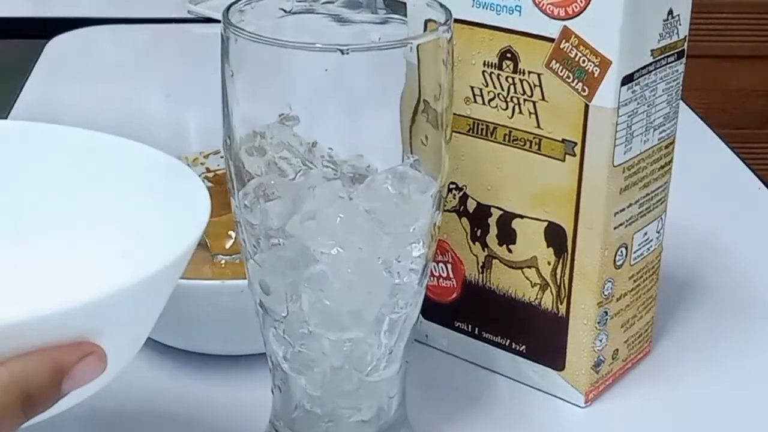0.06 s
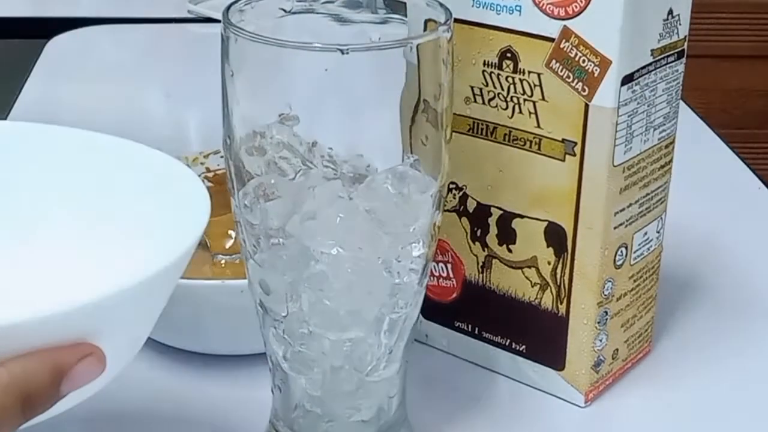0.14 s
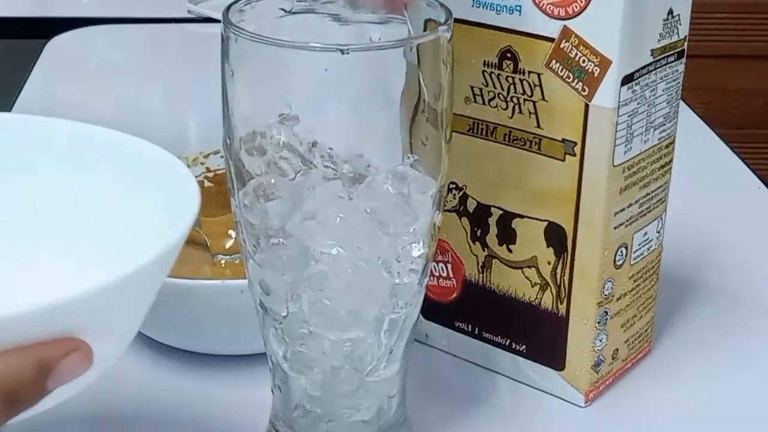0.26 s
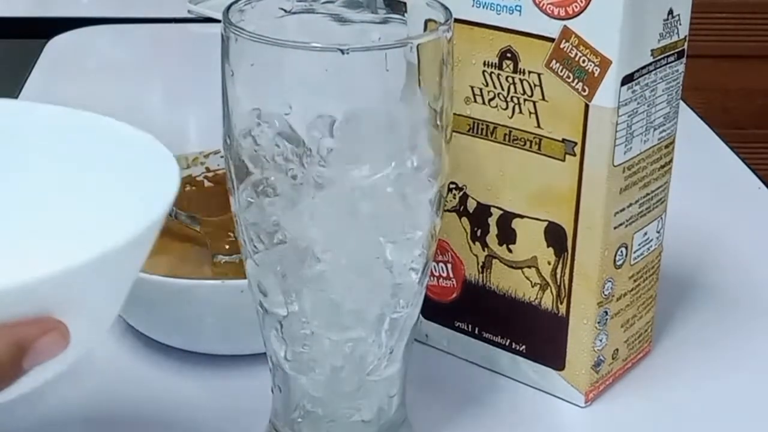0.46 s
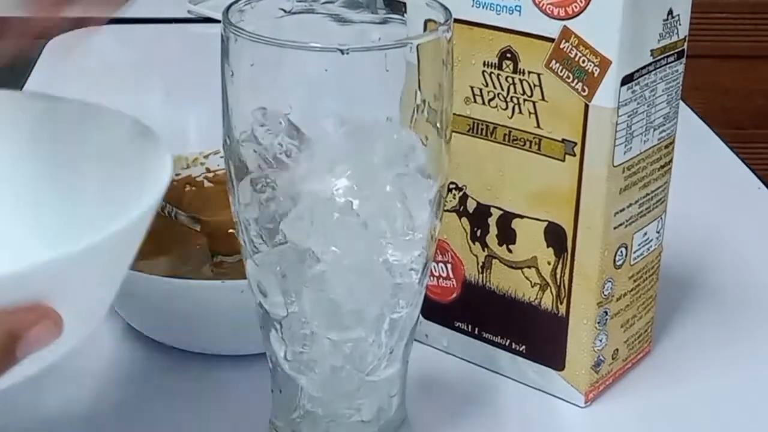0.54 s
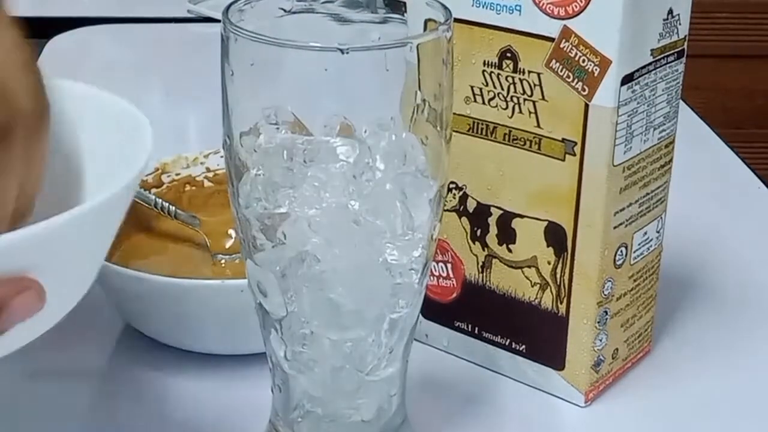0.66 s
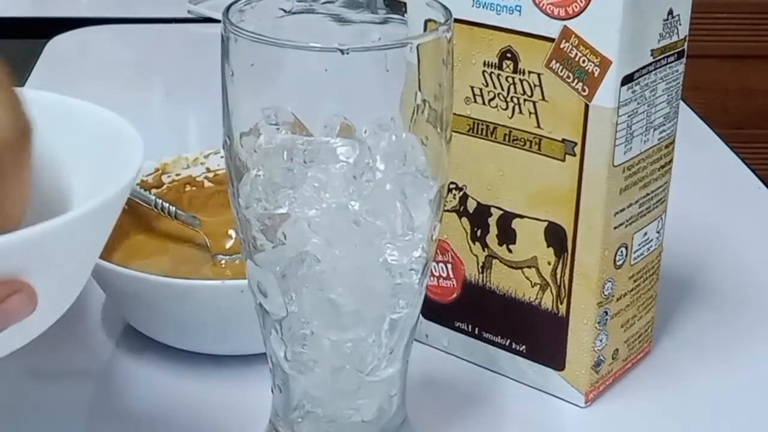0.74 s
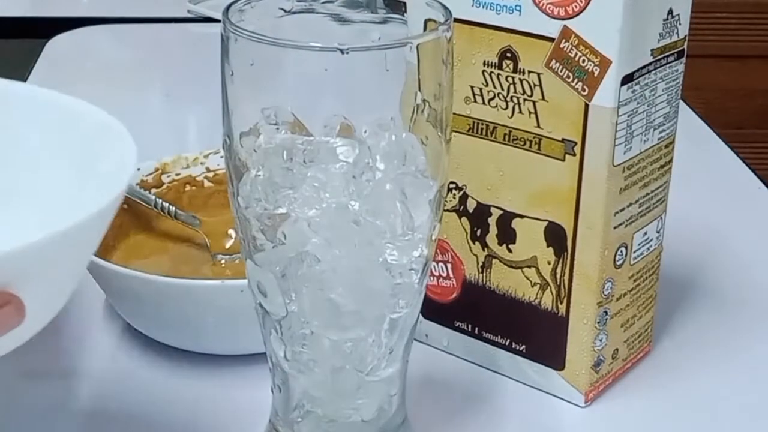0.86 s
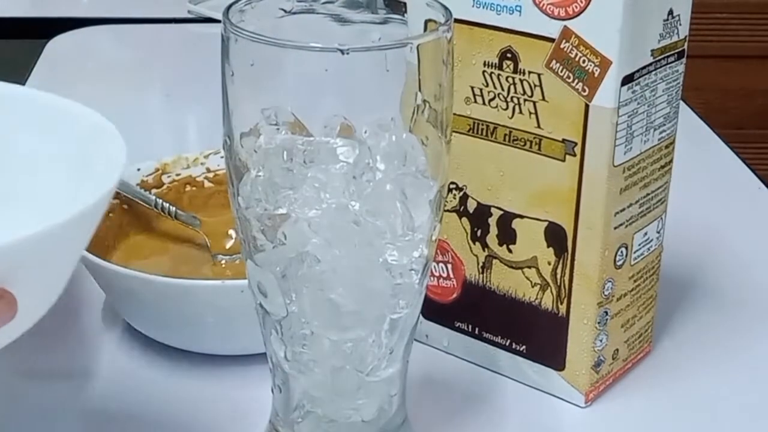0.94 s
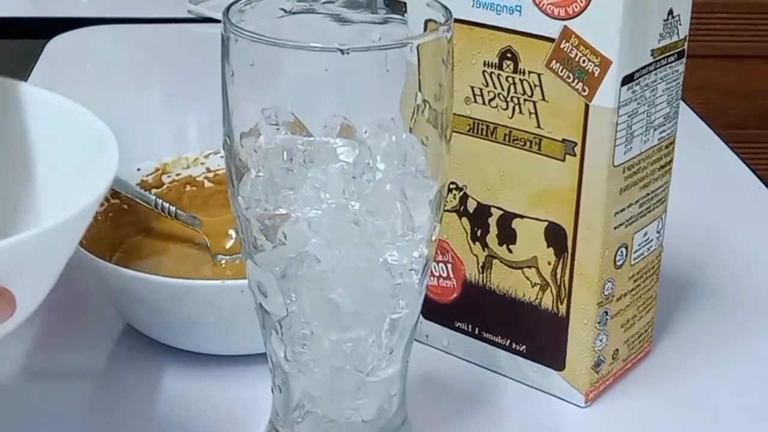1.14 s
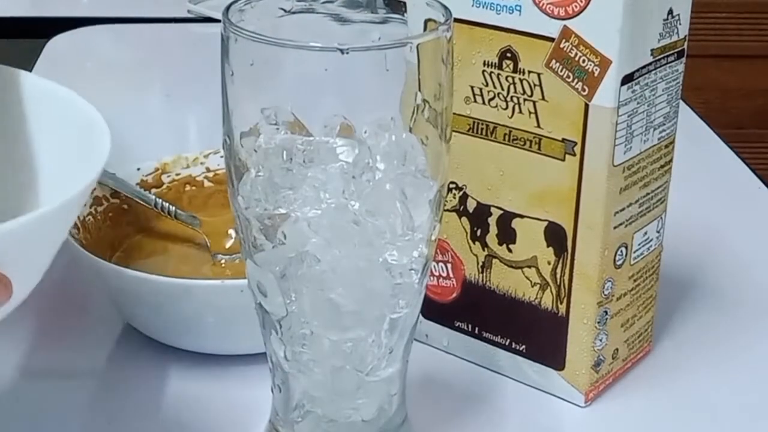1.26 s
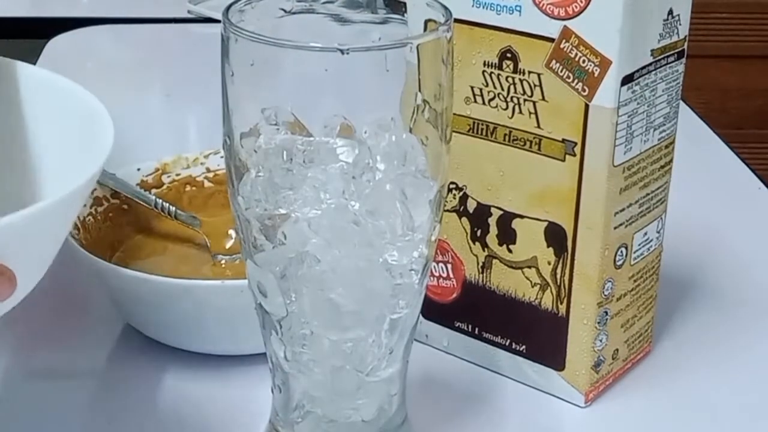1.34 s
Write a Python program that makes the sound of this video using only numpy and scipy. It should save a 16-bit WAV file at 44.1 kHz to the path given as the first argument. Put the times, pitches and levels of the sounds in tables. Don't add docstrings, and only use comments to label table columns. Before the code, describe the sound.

A handful of ice drops into a tall glass with sharp clinks, then cubes knock faintly in a bowl

```python
import sys
import numpy as np
from scipy import signal
from scipy.fft import rfft, irfft
from scipy.io import wavfile
from scipy.ndimage import uniform_filter1d

SR = 44100
rng = np.random.default_rng(int(sys.argv[2]) if len(sys.argv) > 2 else 0)


def voltage_ratio(decibels):
    exponent = np.asarray(decibels, float) / 20
    return 10 ** exponent


def unload_wav(signal):
    wavfile.write(
        sys.argv[1],
        SR,
        np.round(np.clip(np.atleast_2d(signal).T, -1, 1) * 32767).astype(np.int16),
    )


N = 61739


def ice():
    ticks = jostling()
    t = np.arange(N) / SR
    in_glass = (t > .222) & (t < .655)
    scooping = t > .985
    in_bowl = ~(in_glass | scooping)
    return glass_knocks(ticks * in_glass) + scoop_knocks(ticks * scooping) + bowl_knocks(ticks * in_bowl)


# [start_s, peak_db, brightness_db, wall_ring_db, rim_ring_db]
GLASS_KNOCKS = [(.2209, -37, 8, -51, -45), (.2322, -14.5, 4, -31, -37), (.2882, -18.5, 6, -36, -35),
                (.2946, -21.5, 6.5, -28, -24.5), (.2979, -17.5, -4, -17.5, -29), (.3069, -27, 8, -32, -46),
                (.3264, -25, 2, -32, -33), (.3436, -14.5, 3, -29, -33), (.3516, -8.5, -1, -18, -24),
                (.3560, -22.5, 9.5, -22, -26), (.3619, -10.5, 0.5, -18.5, -24.5),
                (.3679, -18, 0, -21, -25.5), (.3764, -17.5, 3, -24, -42), (.3859, -12, 2.5, -30, -27),
                (.3929, -20, 0, -37, -31), (.3989, -13.5, 1, -25, -22.5),
                (.4054, -18.5, -2.5, -22.5, -22.5), (.4144, -19, 1, -34, -26.5),
                (.4254, -14.5, -0.5, -29, -38), (.4374, -21.5, 3.5, -28.5, -44), (.4494, -25, -7, -28, -36),
                (.4614, -24, 7.5, -24, -30), (.4714, -24, -2, -38, -27), (.4859, -33, 8, -40, -44),
                (.4909, -8.5, 1, -25.5, -24.5), (.5024, -26.5, 3, -35, -32), (.5214, -36, -1, -38.5, -51),
                (.5294, -27, -1, -41, -42), (.5424, -30, 8, -44, -40), (.5549, -25.5, -10, -48, -47),
                (.5715, -21, -4.5, -41, -48), (.5801, -21, 1, -43, -50), (.5954, -18, 0, -38, -35),
                (.6154, -18, 0.5, -43, -53), (.6214, -42, -6, -44, -56)]
# [pitch_hz, level_db, time_to_fall_60_db_s]
GLASS_NOTES = [(652, -15.5, .08), (1212, -19, .06), (1345, -17, .06), (2060, -20, .04), (2374, -28, .04),
               (3180, -9, .04), (3228, -2, .045), (3490, -15, .03), (4285, -14, .03), (5892, -9, .1),
               (5950, -3, .12), (7490, -10, .02), (9841, -19, .06), (13680, -21, .04)]
# [pitch_hz, level_db]
GLASS_CRACK = [(150, -19.5), (400, -13.5), (1300, -16), (3200, -13), (7600, -17.5), (8600, -28.5),
               (15500, -29.5)]


def glass_knocks(ticks):
    return vessel(GLASS_KNOCKS, GLASS_NOTES, GLASS_CRACK, ticks)


# [start_s, peak_db, brightness_db, wall_ring_db, rim_ring_db]
SCOOP_KNOCKS = [(.99, -35, 3, -49, -39), (1.0028, -23.5, -3, -42, -48), (1.007, -22, 4, -34.5, -29.5),
                (1.0118, -24.5, -3, -40, -40), (1.0248, -29, 0, -36, -39), (1.0451, -15, -2, -28, -26.5),
                (1.0594, -26, -7, -41, -44), (1.0759, -29, -6, -36, -40), (1.0884, -34, -8, -35.5, -46),
                (1.1417, -31, -6, -48, -56), (1.1721, -26, -9, -45, -51), (1.3735, -23, 5.5, -50, -39),
                (1.3883, -47, 0, -58, -50)]
# [pitch_hz, level_db, time_to_fall_60_db_s]
SCOOP_NOTES = [(3510, -7, .03), (3680, -4, .035), (4310, -6, .03), (4630, -8, .03), (5990, -5, .03),
               (6460, -2, .045), (7720, -11, .03), (10300, -18, .04), (12400, -15, .04), (14300, -15, .03)]
# [pitch_hz, level_db]
BOWL_CRACK = [(800, -52), (1600, -6.5), (3000, -3.5), (4000, 0), (7000, -2.5), (8600, -14), (15500, -11.5)]


def scoop_knocks(ticks):
    return vessel(SCOOP_KNOCKS, SCOOP_NOTES, BOWL_CRACK, ticks)


# [start_s, peak_db, brightness_db, wall_ring_db, rim_ring_db]
BOWL_KNOCKS = [(.0018, -32, 2, -46, -46.5), (.0233, -38, 5, -43, -49), (.0594, -45, 0, -44, -54),
               (.1768, -45, 0, -58, -59), (.6663, -38, 5, -46, -45), (.6848, -36, 5.5, -54, -63),
               (.7728, -39, -1, -59, -48), (.7945, -34, 5, -48, -49), (.8079, -41, 3, -49, -35),
               (.8109, -25.5, 4, -45.5, -35.5), (.8248, -40, -4, -44, -34.5), (.8324, -38, 3, -53, -36.5),
               (.8408, -29, 2.5, -40, -35.5), (.8574, -46, 1, -48, -48), (.8694, -42, 3, -54, -41),
               (.8894, -40, 5.5, -46, -59), (.9272, -38, 3, -43.5, -43.5)]
# [pitch_hz, level_db, time_to_fall_60_db_s]
BOWL_NOTES = [(3450, -7, .05), (3615, -2, .1), (4290, -18, .03), (6150, -11, .07), (6265, -1, .1),
              (6380, -13, .03), (10100, -14, .04), (7510, -14, .03)]


def bowl_knocks(ticks):
    return vessel(BOWL_KNOCKS, BOWL_NOTES, BOWL_CRACK, ticks)


def vessel(hits, modes, crack, ticks):
    body_top_hz, wall_top_hz = 2500, 5000
    contact_s, grip_s = .0013, .00075
    s, db, bright_db, wall_db, rim_db = np.transpose(hits)
    at = ((s + contact_s) * SR).astype(int)

    last = np.searchsorted(at, np.arange(N), "right") - 1
    begun = last >= 0
    age = (np.arange(N) - at[last]) / SR * begun

    grip = int(grip_s * SR)
    nudges = .17 * rng.standard_normal((len(at), len(modes)))
    turns = rng.random(len(modes)) + np.cumsum(nudges, axis=0)
    signs = rng.choice([-1, 1], (len(at), len(modes)))

    out = cracks(at, db, bright_db, crack, ticks)
    for k, (hz, mode_db, t60) in enumerate(modes):
        clicks = ticks * rng.standard_normal(N)
        if hz < body_top_hz:
            clicks = clicks * voltage_ratio(-10.5)
            clicks[at] += signs[:, k] * voltage_ratio(db - bright_db)
            sound = ring(clicks, hz, t60)
        else:
            start_db = wall_db if hz < wall_top_hz else rim_db
            swing = voltage_ratio(start_db[last] + 4 - 60 * age / t60) * begun
            swing = uniform_filter1d(swing, grip, origin=(grip - 1) // 2)
            struck = swing * np.sin(2 * np.pi * (hz * np.arange(N) / SR + turns[last, k]))
            sound = struck + voltage_ratio(-26) * ring(clicks, hz, t60)
        out = out + voltage_ratio(mode_db) * sound
    return out


def cracks(at, db, bright_db, crack, ticks):
    crack_t60_s, snap_t60_s, tick_t60_s = .024, .0056, .0038
    split_hz = 6500
    noise = rng.standard_normal(N)
    knock_noise = 0
    for kind, tilt in (("low", -.3), ("high", 2)):
        clicks = np.zeros(N)
        clicks[at] = voltage_ratio(db - 1.5 + tilt * bright_db)
        fall = decay(clicks, crack_t60_s) + voltage_ratio(-1) * decay(clicks, snap_t60_s)
        band = signal.sosfilt(signal.butter(2, split_hz, kind, fs=SR, output="sos"), noise)
        knock_noise = knock_noise + band * fall
    tick_noise = decay(np.abs(ticks), tick_t60_s) * rng.standard_normal(N) / 4
    level = np.sqrt(np.mean(voltage_ratio(at_hz(crack, np.linspace(100, 16000, 200))) ** 2))
    return colour(.4 * knock_noise + tick_noise, lambda hz: at_hz(crack, hz)) / level


# [start_s, level_db]
JOSTLE_LEVELS = [(0, -54.5), (.1, -68), (.215, -66.5), (.24, -46), (.285, -48), (.3, -36), (.342, -44),
                 (.346, -31), (0.428, -32.5), (.5, -40), (.61, -40.5), (.63, -54.5), (.79, -63),
                 (0.815, -47), (.97, -59), (1.03, -39), (1.08, -45.5), (1.36, -73), (1.385, -49.5)]


def jostling():
    ticks_per_s, spread_db = 3000, 3
    s, db = np.transpose(JOSTLE_LEVELS)
    born = rng.random(N) < ticks_per_s / SR
    sizes = voltage_ratio(spread_db * np.minimum(rng.exponential(1, N), 4)) * rng.choice([-1, 1], N)
    return rms_one(born * sizes) * voltage_ratio(np.interp(np.arange(N) / SR, s, db))


# [start_s, peak_db, pitch_hz, time_to_fall_60_db_s]
CLEAR_NOTES = [
    (.2333, -1, 3225, .023),
    (.3448, -20, 4400, .015),
    (.2225, -42, 13640, .2),
    (.3775, -36, 12400, .04),
    (.4265, -36, 12400, .05),
    (.4865, -34, 12400, .03),
    (1.3755, -38, 4310, .1),
    (1.389, -38, 3700, .1),
]


def pings():
    rise_s = .0015
    t = np.arange(N) / SR
    out = 0
    for s, db, hz, t60 in CLEAR_NOTES:
        age = np.maximum(t - s, 0)
        swell = 1 - np.exp(-age / rise_s)
        out = out + voltage_ratio(db - 60 * age / t60) * swell * np.sin(2 * np.pi * hz * age)
    return out


# [start_s, pitch_hz, level_db]
SLIDE_PATH = [(0, 3610, -37), (0.103, 3533, -48.5), (0.221, 3374, -59), (.4, 3260, -71), (.66, 3290, -59),
              (0.778, 3491, -53.5), (0.852, 3560, -45), (0.979, 3655, -56.5), (1.15, 3612, -50),
              (1.3, 3270, -59.5), (1.371, 3400, -60), (1.4, 3710, -47)]


def slide():
    width_hz, settle = 190, 2000
    s, hz, db = np.transpose(SLIDE_PATH)
    t = np.arange(N) / SR
    r = np.exp(-np.pi * width_hz / SR)
    noise = rng.standard_normal(N + settle) + 1j * rng.standard_normal(N + settle)
    waver = signal.lfilter([1], [1, -2 * r, r * r], noise)[settle:]
    turns = np.cumsum(np.interp(t, s, hz)) / SR
    singing = (waver * np.exp(2j * np.pi * turns)).real
    return voltage_ratio(np.interp(t, s, db)) * rms_one(singing)


# [start_s, peak_db, pitch_hz]
HAND_BUMPS = [(0.058, -59, 93), (0.105, -42, 90), (0.21, -25, 116), (0.282, -27.5, 88), (0.341, -31.5, 152),
              (0.409, -40, 61.9), (0.527, -39.5, 72.5), (0.657, -36, 83), (0.689, -35.5, 75),
              (0.774, -32.5, 87), (0.873, -32.5, 113), (0.985, -32.5, 87.5), (1.052, -33.5, 82.2),
              (1.098, -34.5, 121.9), (1.139, -26, 98.8), (1.192, -35, 91.5), (1.228, -35, 76.6),
              (1.276, -37, 110.3)]


def bumps():
    cycles = 2.17
    t = np.arange(N) / SR
    out = 0
    for s, db, hz in HAND_BUMPS:
        phase = np.clip((t - s) * hz / cycles, 0, 1)
        out = out + voltage_ratio(db) * np.sin(np.pi * phase) ** 2 * np.sin(2 * np.pi * cycles * phase)
    return out


def kitchen(x):
    low_t60_s, high_t60_s, build_up_s = .71, .44, .011
    t = np.arange(SR // 2) / SR
    noise = rng.standard_normal((2, len(t))) * np.clip(t / build_up_s, 0, 1)
    low = signal.sosfilt(signal.butter(1, 5000, fs=SR, output="sos"), noise)
    tail = low * voltage_ratio(-60 * t / low_t60_s) + (noise - low) * voltage_ratio(-60 * t / high_t60_s)
    tail = tail / np.linalg.norm(tail[0])
    mid, side = signal.fftconvolve(x[None], tail, axes=1)[:, :N] * voltage_ratio(-10.5)
    side = signal.sosfilt(signal.butter(1, 1800, fs=SR, output="sos"), side) * voltage_ratio(-49)
    return np.array([mid + side, mid - side])


def leftover():
    level_db, t60_s = -48, .41
    hiss = signal.sosfilt(signal.butter(2, 6000, "high", fs=SR, output="sos"), rng.standard_normal(N))
    return hiss * voltage_ratio(level_db - 60 * np.arange(N) / SR / t60_s)


# [pitch_hz, level_db]
HUM_COLOUR = [(30, -11), (80, 1.5), (250, -1), (900, -7), (1500, -9), (2300, -28), (5500, -20.5),
              (9000, -33.5), (16000, -63)]
# [pitch_hz, width_hz, boost_db]
HUM_RESONANCES = [(197.2, 17.8, 9), (753, 88, 6.5)]
# [pitch_hz, side_level_db]
HUM_SPREAD = [(60, -24), (180, -12), (350, -7), (700, -14), (1400, -7.5), (3000, -5), (9000, -25)]


def hum():
    lean = .99

    def shape(hz):
        peaks = sum(db * np.exp(-((hz - f) / w) ** 2) for f, w, db in HUM_RESONANCES)
        return at_hz(HUM_COLOUR, hz) + peaks

    a, b = rng.standard_normal((2, N))
    mid = colour(a, shape)
    side_noise = np.sqrt(1 - lean ** 2) * b - lean * a
    side = colour(side_noise, lambda hz: shape(hz) + at_hz(HUM_SPREAD, hz))
    return voltage_ratio(-45) * np.array([mid + side, mid - side]) / np.std(mid)


def at_hz(points, hz):
    point_hz, value = np.transpose(points)
    return np.interp(np.log(hz + 1), np.log(point_hz), value)


def rms_one(x):
    return x / np.sqrt(np.mean(x ** 2) + 1e-20)


def colour(x, db_at):
    size = 2 ** 17
    hz = np.arange(size // 2 + 1) * SR / size
    cepstrum = irfft(np.log(voltage_ratio(db_at(hz))))
    cepstrum[1:size // 2] *= 2
    cepstrum[size // 2 + 1:] = 0
    return irfft(rfft(x, size) * np.exp(rfft(cepstrum)))[..., :N]


def decay(x, t60):
    return signal.lfilter([1], [1, -voltage_ratio(-60 / (t60 * SR))], x + 1e-18)


def ring(clicks, hz, t60):
    r = voltage_ratio(-60 / (t60 * SR))
    w = 2 * np.pi * hz / SR
    return signal.lfilter([0, np.sin(w)], [1, -2 * r * np.cos(w), r * r], clicks + 1e-18)


def scene():
    x = ice() + pings() + slide()
    return x + kitchen(x) + bumps() + hum() + leftover()


def low_pass(x):
    return signal.sosfilt(signal.butter(12, 16500, fs=SR, output="sos"), x)


def record(dry):
    top = .5
    dry = signal.sosfilt(signal.butter(2, 59.4, "high", fs=SR, output="sos"), dry)
    dry = top * np.tanh(dry / top)

    def steps(hz):
        return sum(db / (1 + np.exp(np.clip((f - hz) / 60, -50, 50))) for f, db in [(8180, -2), (15800, -30)])

    return low_pass(colour(dry, steps))


dry = scene()
out = record(dry)
unload_wav(out)
```